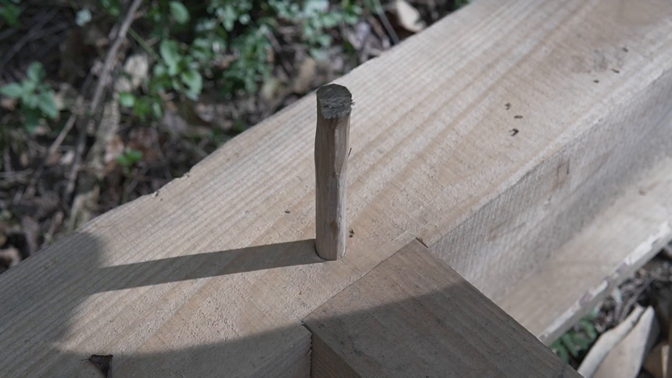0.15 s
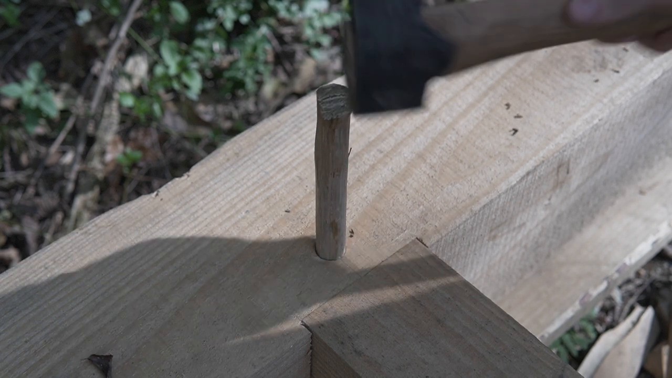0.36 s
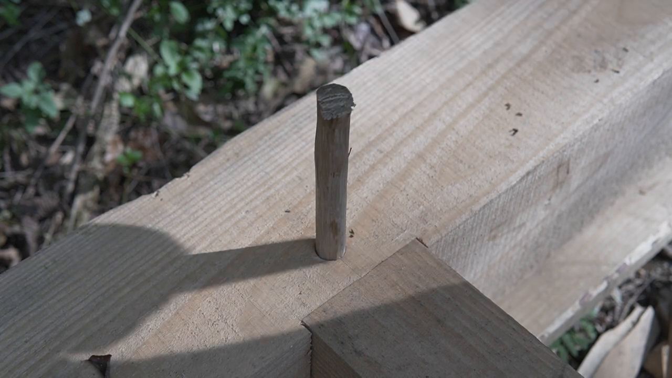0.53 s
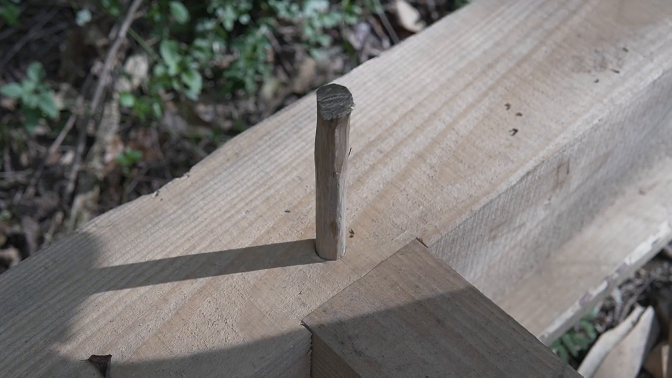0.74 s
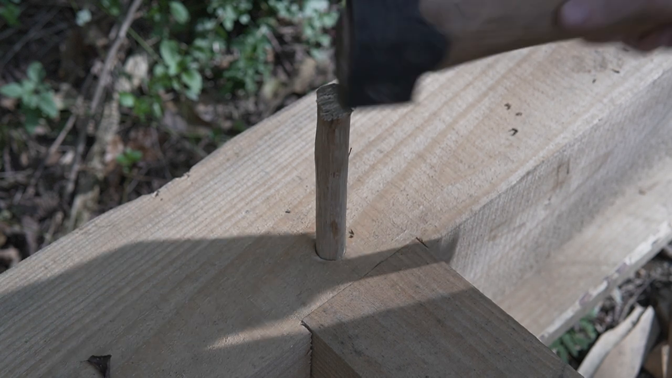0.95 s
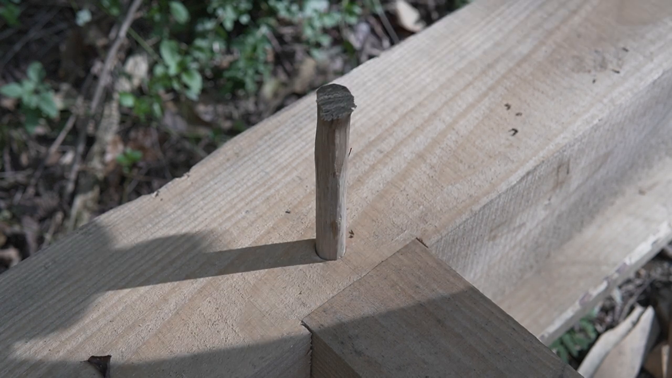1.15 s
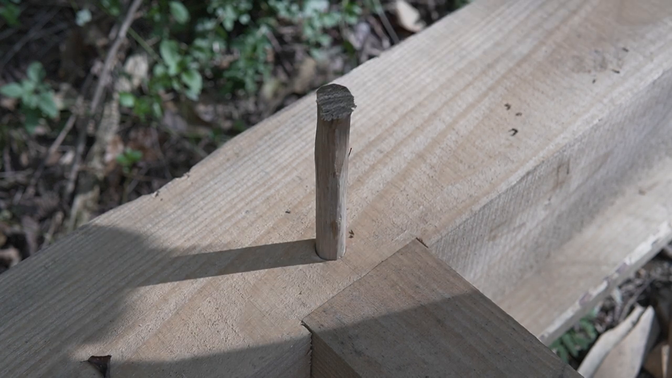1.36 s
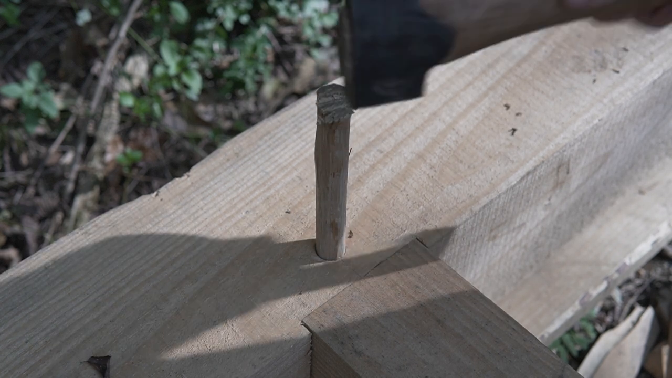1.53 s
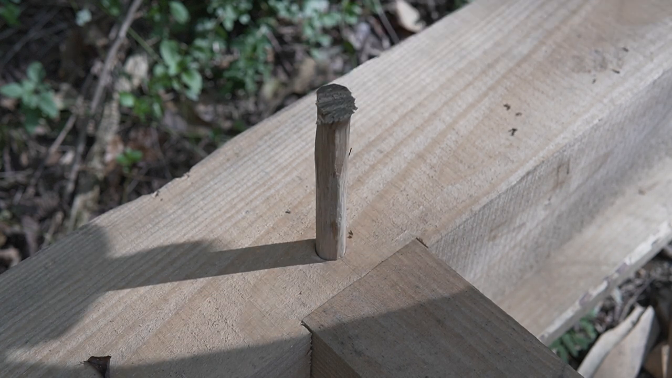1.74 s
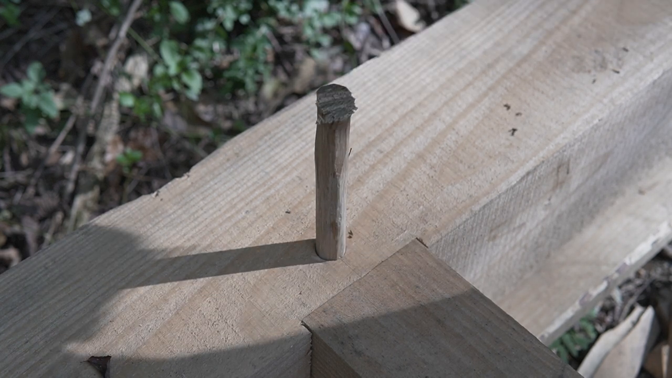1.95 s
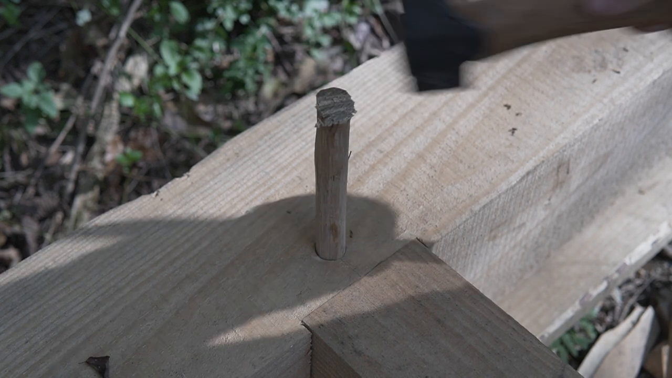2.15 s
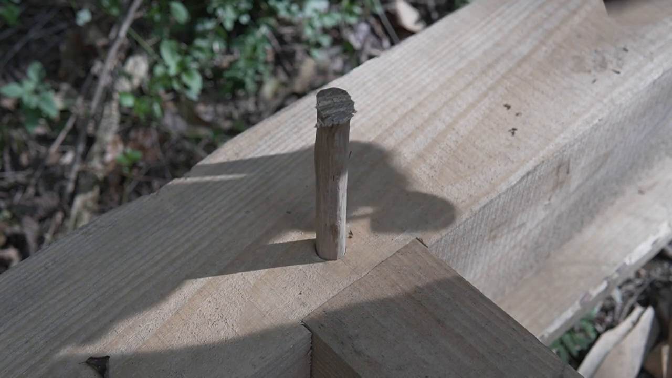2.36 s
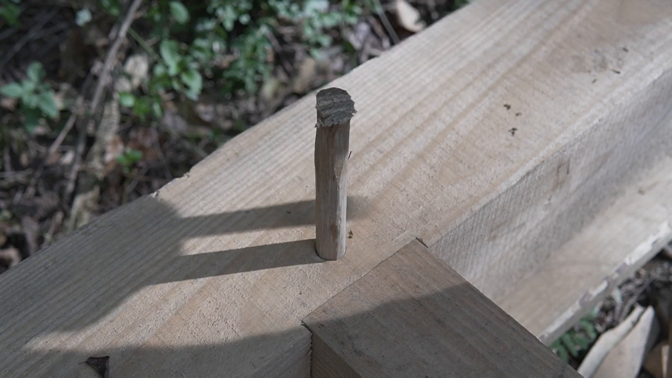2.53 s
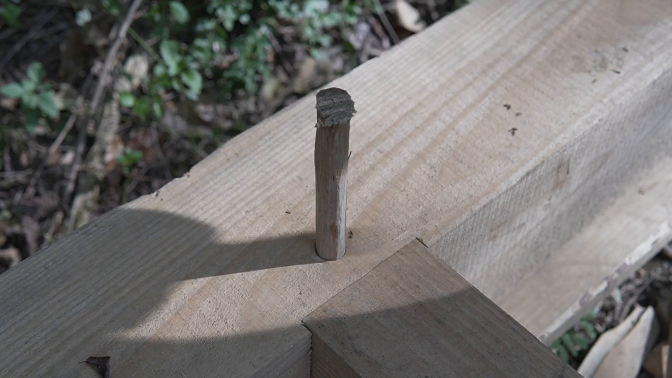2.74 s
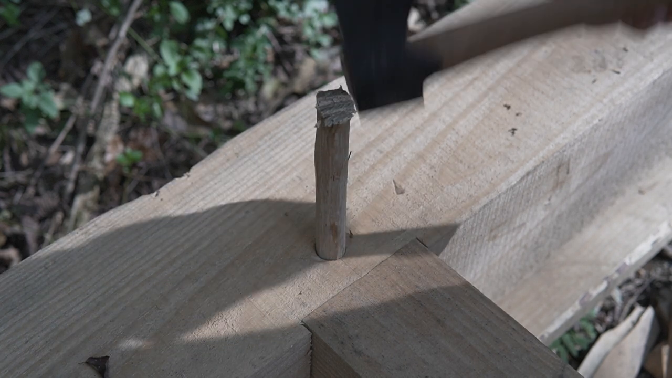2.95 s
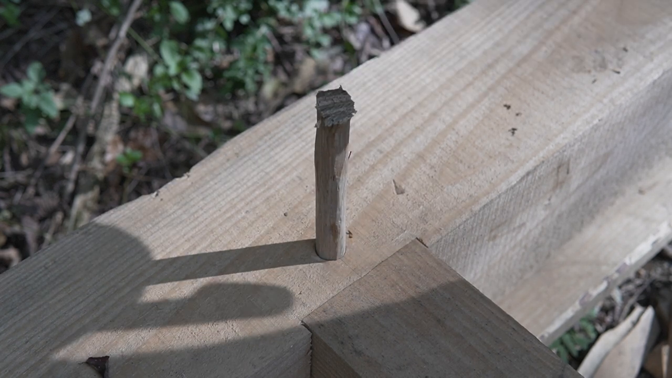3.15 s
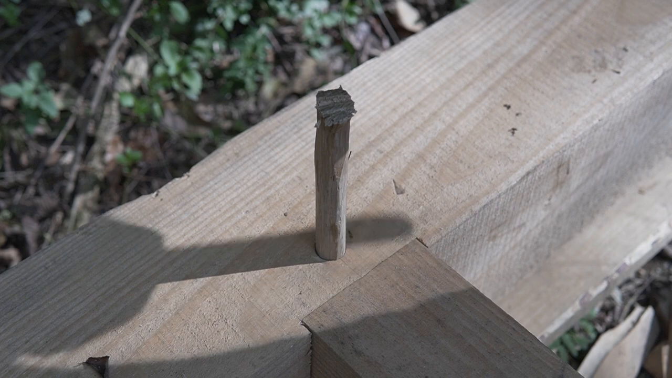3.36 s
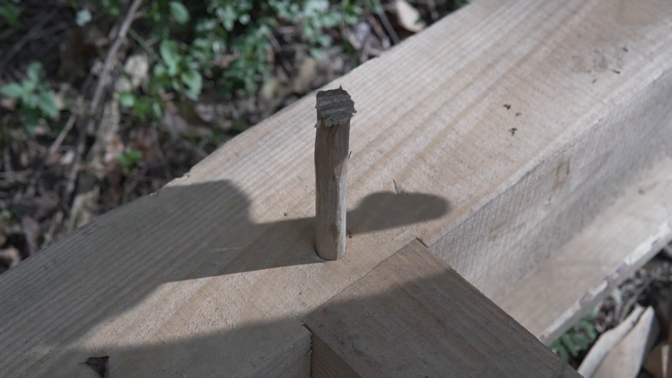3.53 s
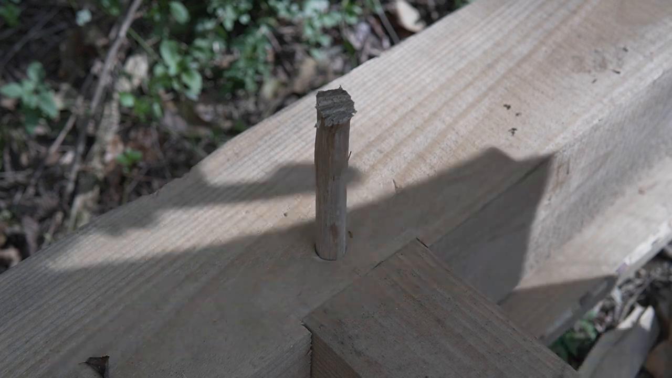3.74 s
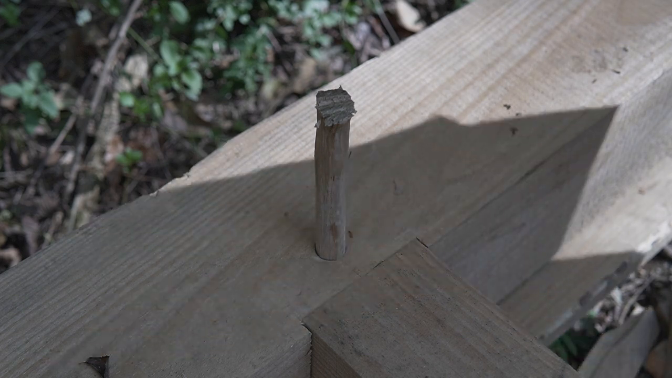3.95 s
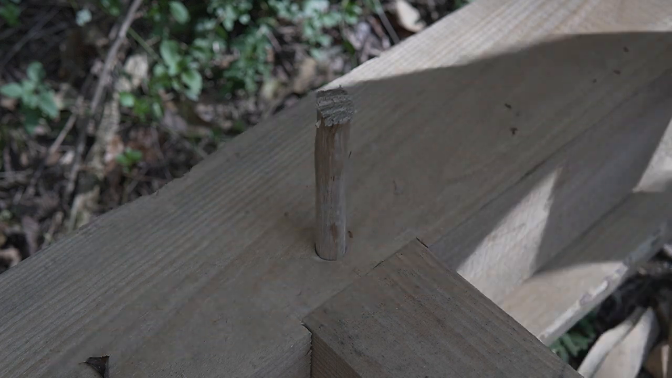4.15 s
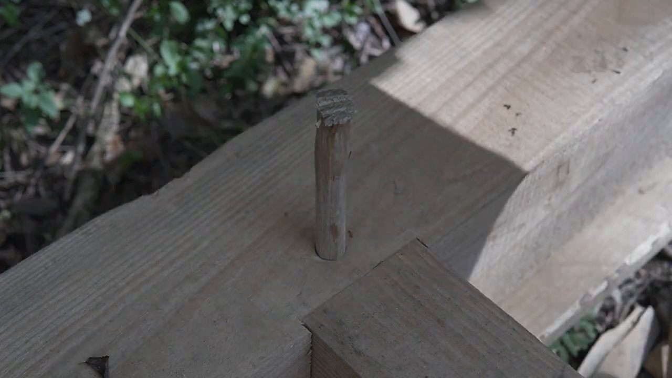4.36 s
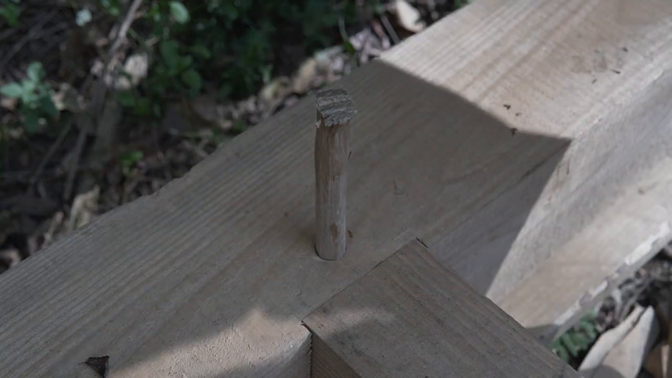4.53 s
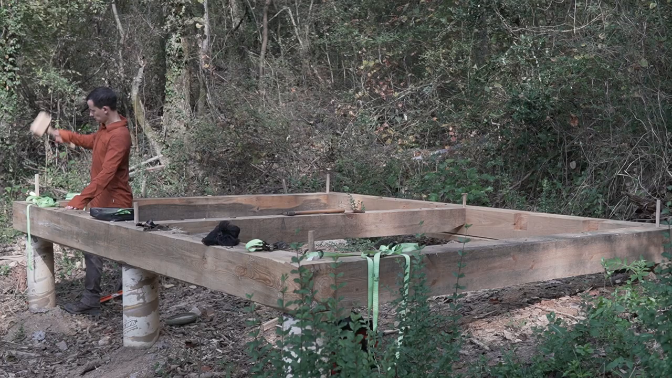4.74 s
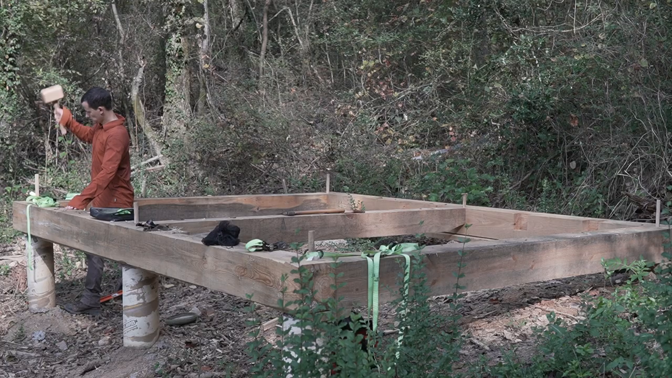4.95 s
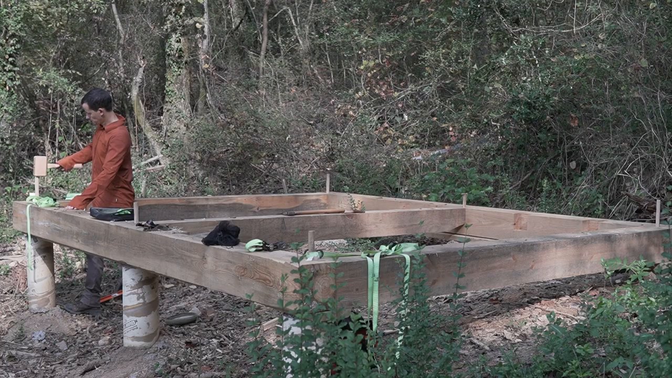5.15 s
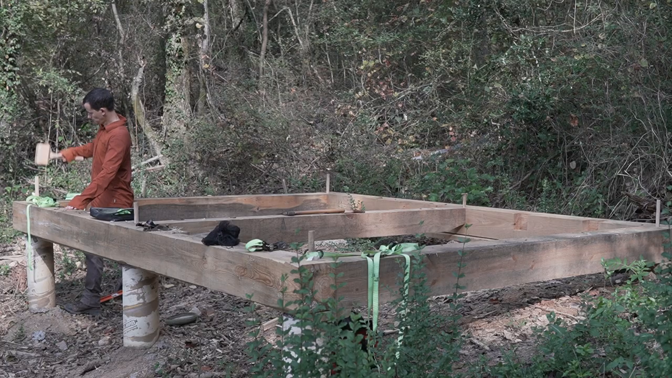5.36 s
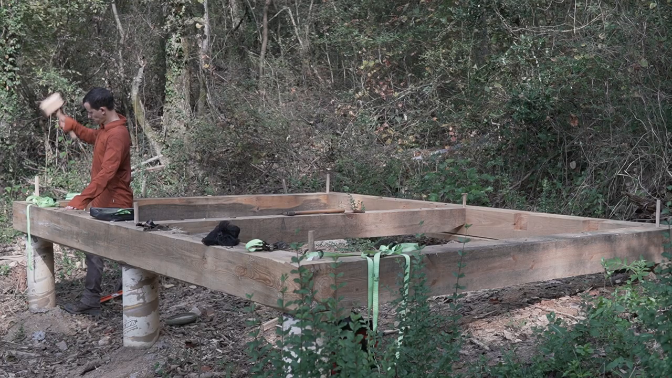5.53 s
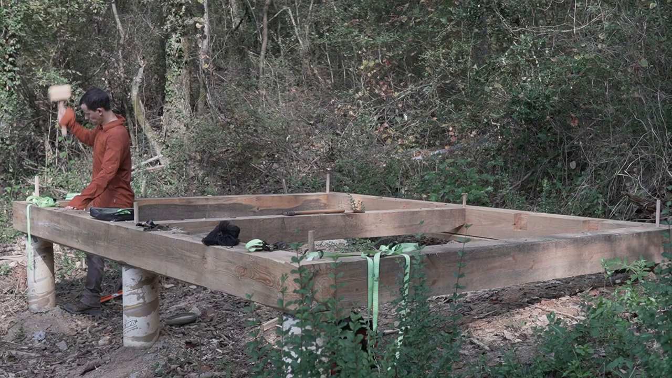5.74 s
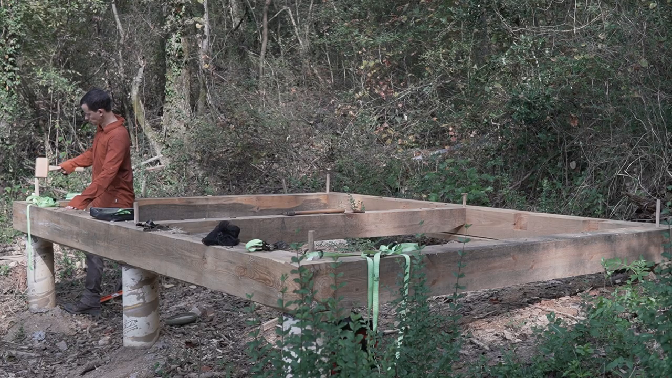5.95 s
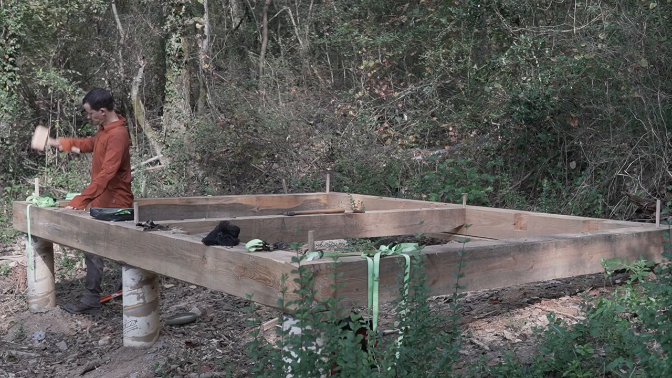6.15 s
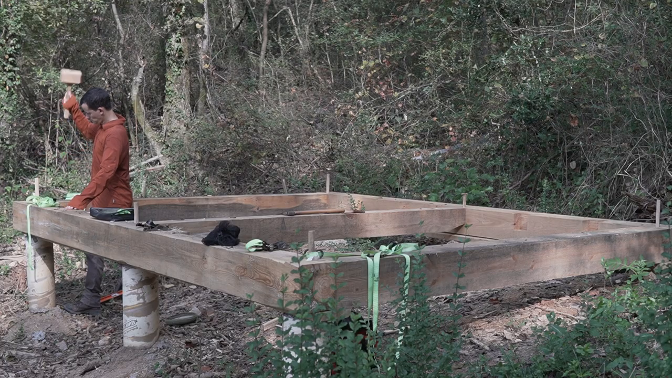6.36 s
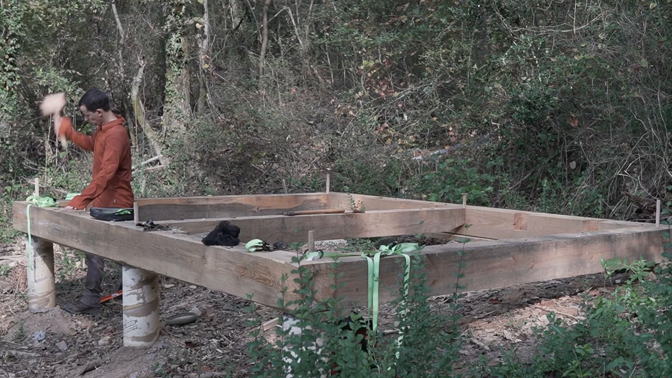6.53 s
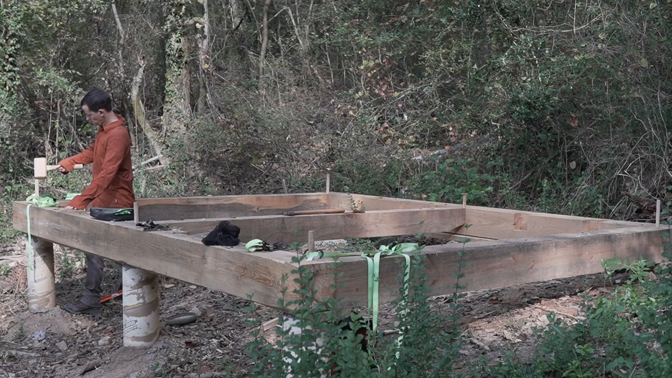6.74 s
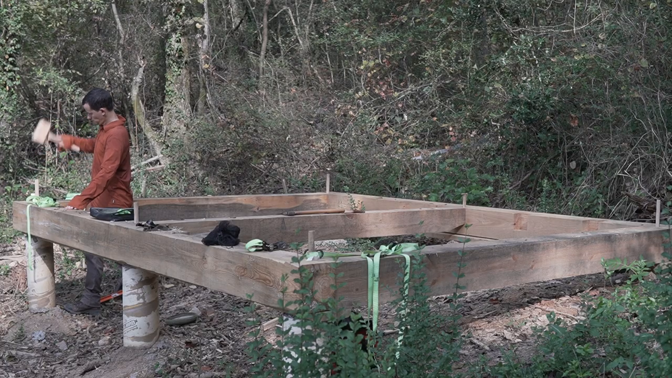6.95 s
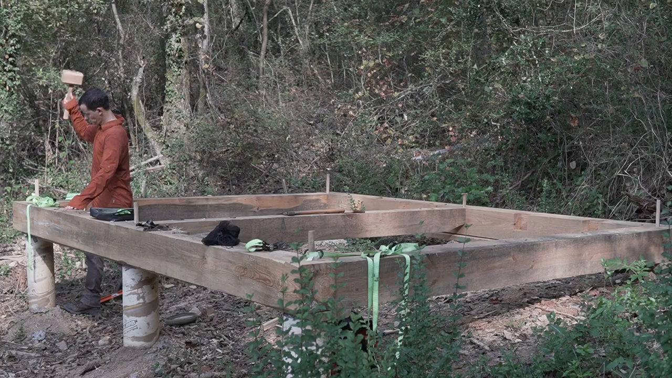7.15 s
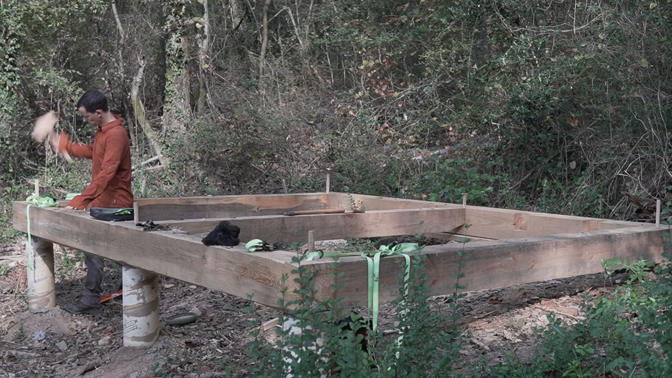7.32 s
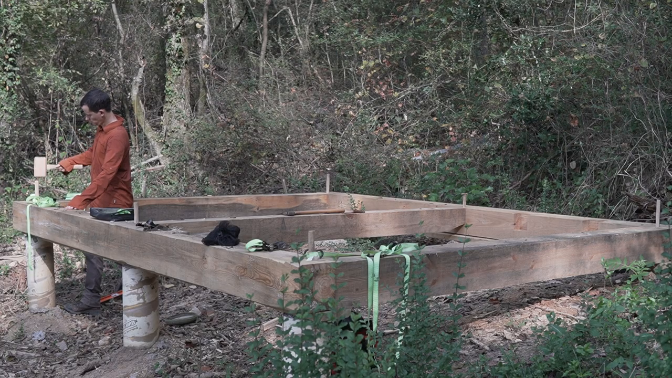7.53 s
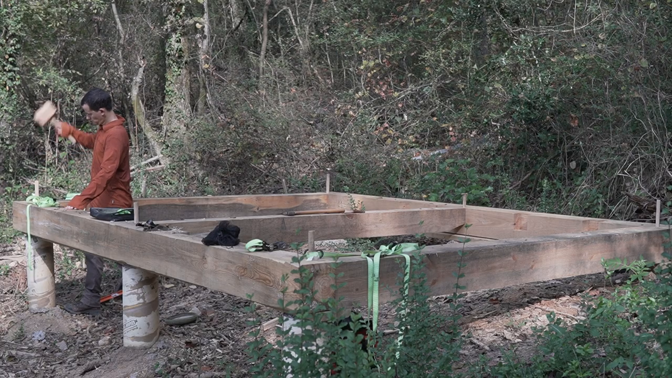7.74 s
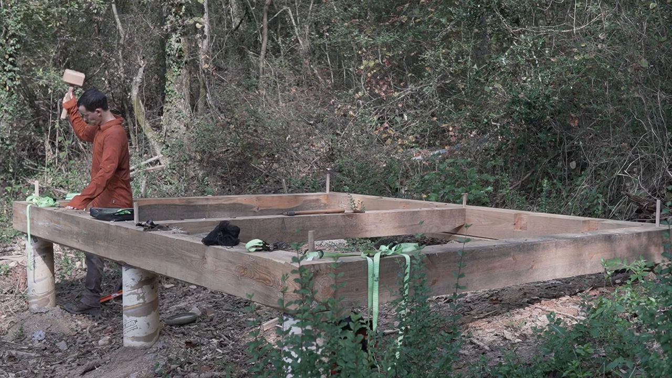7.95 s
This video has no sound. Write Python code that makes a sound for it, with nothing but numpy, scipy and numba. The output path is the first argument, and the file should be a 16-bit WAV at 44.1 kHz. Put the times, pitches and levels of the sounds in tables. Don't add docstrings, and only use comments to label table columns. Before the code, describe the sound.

Close, clipped wooden whacks come about every six tenths of a second, varying from light and low to very hard, each setting heavy beams resonating. After a pause filled with soft leaf crunches, twig ticks and dull heel thuds, the hammering resumes farther off, slower and steady, growing tighter and harder, with echo through the trees. The woodland background is very quiet, with insects, a few chirps and a light breeze.

```python
import sys
import numpy as np
from scipy import signal
from scipy.fft import irfft
from scipy.io import wavfile
from scipy.ndimage import uniform_filter1d
from numba import njit

SR = 44100
rng = np.random.default_rng(int(sys.argv[2]) if len(sys.argv) > 2 else 0)


def materialize(psi):
    bounded = np.clip(np.atleast_2d(psi).T, -1, 1)
    quanta = np.round(bounded * 32767).astype(np.int16)
    wavfile.write(sys.argv[1], SR, quanta)


def gain_from_db(level_db):
    decades = np.asarray(level_db, float) / 20
    return 10 ** decades


N = 356769
LEAD = SR // 2


# t/s, crack level/dB, peg f/Hz, brightness/dB per octave, beam level/dB
NEAR_BLOWS = [
    (-.25, 4, 2000, 7, 1),
    (0.3377, 11.5, 938.5, -2.5, 0.5),
    (0.9225, 2.5, 900, 2, 1),
    (1.4977, 4, 560, -4, 2.5),
    (2.091, 14.5, 915, 2.5, 1),
    (2.8613, 5, 2122, -1.5, -7),
    (2.8963, -12, 803.7, -3.5, -2),
]
# echo peak at the peg level/dB, its width/octaves, mallet f/Hz, its level/dB, splinter level/dB
NEAR_HUE = (3.5, 1.47, 2699, -0.94, 0.57)
# f/Hz, level/dB, t60/s
NEAR_HEAD = [(1140, -8.5, 0.037), (1747, -6, 0.026), (2180, -6, 0.019), (5210, -10.5, 0.0057)]
# f/Hz, level/dB
NEAR_KNOCK = [(150, -25), (400, -4.5), (800, 0), (1250, -3), (1800, -20.5), (4000, -49.5)]
# f/Hz, level/dB, t60/s
NEAR_BEAMS = [(77, -16, 0.39), (141, -15, .32), (220, -6, 0.27), (303.7, -0.5, 0.27), (372.7, -5, .22),
              (477, -13.5, 0.22), (598, -13, .15), (627, -11.5, 0.12), (900, -15.5, 0.13)]
# f/Hz, level/dB, t60/s
FRAME_SWAY = [(23.93, -30, 4.3), (37.4, -35, 4.1)]
# f/Hz, level/dB
NEAR_TREES = [(100, -31), (300, -9), (700, -5), (1500, -4.5), (2400, -2), (3500, 2), (4600, -12),
              (9000, -25), (15000, -33.5), (17000, -51)]


def near_blows():
    mix = np.zeros(LEAD + N)
    for s, db, hz, tilt_db, beams_db in NEAR_BLOWS:
        hit = crack(hz, tilt_db, NEAR_HEAD, NEAR_HUE, contact=.002, snap_db=0.5, peg_t60=0.013)
        add(mix, s, gain_from_db(db) * hit)
        echo_db = 0.58 * db + .8 * tilt_db
        echo = trees(NEAR_TREES, hz, tilt_db, NEAR_HUE, rise=0.0027, early_db=2.5, early_t60=0.033,
                     edge_s=0.065, edge_db=6.5)
        add(mix, s, gain_from_db(echo_db) * echo)
        thump = ring([(339.6, 5.5, 0.033), (560, -3, 0.01)], .1, rise=0.00025)
        add(mix, s, gain_from_db(beams_db + 0.5) * thin(thump))
        knock = evened(signal.oaconvolve(rng.standard_normal(6000), thick(NEAR_KNOCK), "same"))
        add(mix, s, gain_from_db(.3 * db - 15.5 - 60 * np.arange(6000) / SR / 0.096) * knock)
        add(mix, s, beams(NEAR_BEAMS, beams_db - 6.5, rise=0.02, slowing=0.71, twin_db=-4.0,
                          joints_db=-7.5, joints_t60=0.2))
        add(mix, s + 0.024, gain_from_db(beams_db - 6.5) * ring(FRAME_SWAY, 3.1, rise=.03))
        burst = rng.standard_normal(2600) * np.hanning(2600)
        slap = signal.oaconvolve(burst, ring([(647, 0, 0.018)], 0.037))
        add(mix, s + .185, gain_from_db(beams_db - 55) * evened(slap))
    return mix[LEAD:]


# t/s through the air, crack level/dB, peg f/Hz, mallet f/Hz, loudest beam f/Hz
FAR_BLOWS = [
    (5.1491, -1, 1267, 3507, 269),
    (5.914, 0, 1600, 1103, 259.7),
    (6.6678, 3, 1449, 1823, 286.3),
    (7.4296, 7, 1833, 1179, 306.2),
]
# f/Hz, level/dB, t60/s
TIMBER_KNOCK = [(1270, 6, 0.052), (1600, 5, .03), (2000, 8, 0.027), (3300, -16, 0.046)]
# f/Hz, level/dB, t60/s
FAR_HEAD = [(2000, -11.5, 0.014), (3073, -9, 0.02), (3830, -13.5, 0.0074), (5900, -11, 0.0077)]
# f/Hz, level/dB, t60/s
FAR_BEAMS = [(73.4, -4.5, 0.29), (103.5, -8, 0.285), (158.9, -4, 0.2624), (226.4, -5, .24),
             (334.2, -16, 0.46), (484, -18.5, 0.13)]
# f/Hz, level/dB
FAR_TREES = [(100, -28), (300, -11), (700, -3.5), (1500, -5.5), (3300, 4), (5000, -5), (9000, -18),
             (15000, -28), (17000, -50)]


def far_blows():
    mix = np.zeros(LEAD + N)
    timber_lead_s = .0069
    for k, (s, db, hz, mallet_hz, beam_hz) in enumerate(FAR_BLOWS):
        loose = 0.14 ** k
        loss_db = 0.5 * loose
        tilt_db = 0.5 - .3 * db
        ring_db = 9.5 + 10 * loose
        hue = (ring_db, 4.8 / ring_db, mallet_hz, .4, -.3)

        knock = ring(TIMBER_KNOCK + [(hz, 5, .04)], .08, rise=0.0014)
        add(mix, s - timber_lead_s, gain_from_db(-14 - .5 * loss_db) * knock)
        hit = crack(hz, tilt_db, FAR_HEAD, hue, contact=.0012, snap_db=-1.0, peg_t60=0.015)
        add(mix, s, gain_from_db(db - 6.5) * hit)
        loose_peg = ring([(hz * .96, -11.5, 0.088), (hz * 1.02, -14.5, 0.088)], .2, rise=.001)
        add(mix, s, loose * loose_peg)
        echo = trees(FAR_TREES, hz, tilt_db, hue, rise=0.0065, early_db=4.0, early_t60=0.193,
                     edge_s=0.043, edge_db=1.0)
        add(mix, s - timber_lead_s, gain_from_db(8 + .45 * db) * echo)
        loudest = (beam_hz, 0.5 - loss_db, 0.26)
        add(mix, s, beams(FAR_BEAMS + [loudest], -17.5, rise=0.011, slowing=0.22, twin_db=-5.0,
                          joints_db=-1, joints_t60=.25))
    return mix[LEAD:]


# f/Hz, level/dB
FIBRE_SNAP = [(300, -29), (1000, -3.5), (2500, 9), (6000, -3.5), (11000, -16.5), (15000, -16.5),
              (17500, -41.5)]


def crack(hz, tilt_db, head, hue, contact, snap_db, peg_t60):
    _, _, mallet_hz, mallet_db, splinter_db = hue
    t = np.arange(4000) / SR
    modes = head + [(hz, 0, peg_t60), (mallet_hz, mallet_db, peg_t60)]
    body = ring(modes, 4000 / SR, rise=0.000086)
    second_contact = np.r_[np.zeros(round(contact * SR)), body][:4000]
    fibres = rng.standard_normal(4000) * np.exp(-(t / (1.7 * contact)) ** 2)
    snap = gain_from_db(snap_db + splinter_db) * coloured(fibres, FIBRE_SNAP)
    return thin(coloured(body + second_contact + snap, [(100, 0), (1e4, 0.00035)], tilt_db))


# f/Hz, level/dB
JOINT_RATTLE = [(60, -14), (150, -0.5), (300, 1), (600, -5.5), (1100, -13.5), (1600, -18.5), (3000, -50.5)]


def beams(modes, db, rise, slowing, twin_db, joints_db, joints_t60):
    detune = rng.uniform(-1, 1, len(modes))
    twins = [(hz * (1 + .07 * a), d + twin_db, 1.1 * t60) for (hz, d, t60), a in zip(modes, detune)]
    t = np.arange(SR // 2) / SR
    tones = np.zeros(len(t))
    for mode in modes + twins:
        swell = 1 - np.exp(-(t / rise * (mode[0] / 300) ** slowing) ** 3)
        tones = tones + ring([mode], .5) * swell
    rattle = evened(signal.oaconvolve(rng.standard_normal(len(t)), thick(JOINT_RATTLE), "same"))
    rattle = rattle * gain_from_db(joints_db - 60 * t / joints_t60) * (1 - np.exp(-t / 0.0013))
    return gain_from_db(db) * (tones + rattle)


# f/Hz, t60/s
WOODS_T60 = [(100, 0.02), (300, 1), (600, 0.73), (1200, 0.83), (3000, 0.74), (6000, 0.6854), (12000, 0.56)]


def trees(colour, peg_hz, tilt_db, hue, rise, early_db, early_t60, edge_s, edge_db):
    peak_db, peak_octaves, mallet_hz, mallet_level_db, _ = hue
    hz, t, z = signal.stft(rng.standard_normal(SR * 3 // 2), SR, nperseg=512)
    peg_db = peak_db * np.exp(-(np.log2((hz + 1) / peg_hz) / peak_octaves) ** 2)
    mallet_db = 0.99 * (mallet_level_db + 3.0) * np.exp(-(np.log2((hz + 1) / mallet_hz) / .22) ** 2)
    colour_db = read(colour, hz) + tilt_db * np.log2((hz + 1000) / 3000) + peg_db + mallet_db
    late = gain_from_db(-60 * t / read(WOODS_T60, hz)[:, None])
    early = gain_from_db(early_db - 60 * t / early_t60)
    tail = signal.istft(z * gain_from_db(colour_db)[:, None] * (late + early), SR, nperseg=512)[1]
    t = np.arange(len(tail)) / SR
    build = 1 - np.exp(-(t / rise) ** 2)
    tree_line = gain_from_db(edge_db * np.exp(-((t - edge_s) / 0.016) ** 2))
    tail = tail * build * tree_line
    return tail / np.linalg.norm(tail)


# t/s, level/dB, f/Hz, t60/s
BEAM_ROCKS = [
    (6.761, -17.5, 288.4, 0.25),
    (7.489, -23, 318, 0.11),
]


def rocking_beams():
    mix = np.zeros(LEAD + N)
    for s, db, hz, t60 in BEAM_ROCKS:
        add(mix, s, ring([(hz, db, t60)], .4, rise=0.13 * t60))
    return mix[LEAD:]


# f/Hz, level/dB
LEAF_LITTER = [(100, -15), (400, 8), (1000, 2.5), (3300, 3.5), (6000, -6.5), (11000, -14.5), (14500, -24),
               (16500, -47)]
# t/s, peak level/dB
TWIG_SNAPS = [(3.1766, -37), (3.2076, -37), (3.2219, -35), (3.2311, -30), (3.2918, -40.5), (3.371, -26.5),
              (3.4353, -43), (3.49, -35), (3.6600, -32), (3.6993, -23), (3.7755, -29), (3.8114, -40),
              (3.8494, -39), (3.952, -35), (3.9757, -38), (3.9992, -33), (4.0424, -51), (4.1591, -44),
              (4.5464, -35), (4.606, -33), (4.5745, -33), (4.6977, -35)]


def twigs():
    mix = np.zeros(LEAD + N)
    for s, db in TWIG_SNAPS:
        tick = rng.standard_normal(200) * np.exp(-np.arange(200) / 17.0)
        tick = 2.7 * tick / np.linalg.norm(tick)
        hz = 3080 * (1 + 0.13 * rng.uniform(-1, 1))
        add(mix, s, gain_from_db(db) * (.5 * coloured(tick, LEAF_LITTER, 5.1) + ring([(hz, -9, .003)], 200 / SR)))
    return mix[LEAD:]


# t/s, length/s, level/dB, brightness/dB per octave
LEAF_CRUNCHES = [(3.209, 0.068, -61, 4.5), (3.417, 0.11, -50, -4), (3.43, 0.025, -58, 5),
                 (3.655, 0.049, -38.5, 4), (3.683, 0.05, -45, 1), (3.74, 0.088, -51, -2),
                 (3.929, 0.092, -52, -1.5), (4.016, 0.12, -55.5, 0), (4.065, 0.077, -49, 3),
                 (4.139, 0.084, -62.5, 2), (4.219, 0.14, -66.5, 3), (4.419, 0.14, -63.5, 1.5),
                 (4.564, 0.085, -54, 2.5), (4.685, .03, -61.5, -1), (3.489, 0.23, -67, 0.5),
                 (3.779, 0.17, -65, 0.5), (3.962, .2, -59, -0.5), (4.3, 0.22, -70, 1.5)]


def leaves():
    mix = np.zeros(LEAD + N)
    for s, length, db, tilt_db in LEAF_CRUNCHES:
        fine, clumps, snaps = rng.standard_normal((9000, 3))[:round(length * SR)].T
        clumps_db = 4 * evened(uniform_filter1d(clumps, 90))
        grains = fine * gain_from_db(clumps_db) * (1 + 2.5 * (snaps > 2.6))
        crunch = evened(coloured(grains, LEAF_LITTER, tilt_db))
        add(mix, s, gain_from_db(db) * crunch * np.hanning(len(crunch)) ** 1.1)
    return mix[LEAD:]


# t/s, level/dB, f/Hz, t60/s
HEEL_THUDS = [(3.44, -45, 388, .05), (3.67, -32, 71.5, 0.074), (3.68, -38, 313, 0.039),
              (3.766, -39.5, 200, 0.071), (3.948, -27.5, 61, 0.093), (3.948, -38.5, 298, 0.044),
              (3.975, -36, 690, 0.021), (3.952, -34, 800, .02), (3.766, -42, 650, .025),
              (3.971, -30.5, 114, 0.036), (4.102, -37, 220, 0.046), (4.606, -30, 320.3, 0.091),
              (4.606, -34, 102, 0.054)]


def thuds():
    mix = np.zeros(LEAD + N)
    for s, db, hz, t60 in HEEL_THUDS:
        add(mix, s, ring([(hz, db, t60)], .4, rise=.0015))
    return mix[LEAD:]


# t/s, length/s, start f/Hz, end f/Hz, level/dB
BIRD_NOTES = [
    (1.977, 0.095, 3486, 3560, -58),
    (5.326, 0.21, 8700, 9050, -78),
    (5.547, 0.068, 4600, 4600, -75),
    (5.65, 0.055, 4590, 4580, -74),
    (6.26, 0.026, 5900, 5900, -68),
    (6.586, 0.0113, 3540, 3440, -63),
    (6.559, .08, 8260, 8440, -81.5),
    (7.865, .03, 3400, 3450, -62),
]


def birds():
    mix = np.zeros(LEAD + N)
    for s, length, start_hz, end_hz, db in BIRD_NOTES:
        u = np.linspace(0, 1, round(length * SR))
        hz = start_hz + (end_hz - start_hz) * np.sin(u * 2.2)
        whistle = np.sin(2 * np.pi * np.cumsum(hz) / SR)
        add(mix, s, gain_from_db(db) * whistle * np.sin(np.pi * u) ** .5)
    return mix[LEAD:]


# f/Hz, width/Hz, level/dB, throb/dB
INSECT_CHOIRS = [
    (6826, 560, -73, 1.),
    (7433, 800, -77.5, 3),
    (3230, 450, -76.5, 4),
]


def insects():
    out = np.zeros(N)
    for centre_hz, width_hz, db, throb_db in INSECT_CHOIRS:
        edges_hz = [centre_hz - width_hz / 2, centre_hz + width_hz / 2]
        band = signal.butter(2, edges_hz, "bandpass", fs=SR, output="sos")
        throb = evened(uniform_filter1d(uniform_filter1d(rng.standard_normal(N), 500), 500))
        out = out + gain_from_db(db + throb_db * throb) * evened(signal.sosfilt(band, rng.standard_normal(N)))
    return out


# f/Hz, level/dB per Hz
DISTANT_AIR = [(65, -33), (110, -1.5), (210, -6), (400, -14), (900, -15.5), (1500, -21), (2500, -26.5),
               (4000, -30.5), (6000, -38), (9000, -55.5)]


def distant_air():
    frames, hz = N // 256 + 5, np.fft.rfftfreq(1024, 1 / SR)
    a, b, patches = rng.standard_normal((frames, 513, 3)).T
    patches = evened(uniform_filter1d(uniform_filter1d(patches, 10, 0), 14, 1))
    z = (a + 1j * b) * gain_from_db(read(DISTANT_AIR, hz)[:, None] + 2.6 * patches)
    air = evened(signal.istft(z, nperseg=1024, noverlap=768)[1][:N])
    return air * gain_from_db(-57.5 + background_db())


def rumble():
    band = signal.butter(2, [19, 115], "bandpass", fs=SR, output="sos")
    lumps_db = 3 * evened(uniform_filter1d(uniform_filter1d(rng.standard_normal(N), 3000), 3000))
    wind = evened(signal.sosfilt(band, rng.standard_normal(N)))
    return gain_from_db(-57 + 1.1 * background_db() + lumps_db) * wind


# t/s, level/dB
BACKGROUND_LEVEL = [(0, -2.5), (1.5, -3), (2.799, -4), (3.3, -1.7), (4.5, -3.5), (4.65, 3.5), (5.099, -0.4),
                    (6.5, 0), (8.09, -1.5)]


def background_db():
    return np.interp(np.arange(N) / SR, *np.transpose(BACKGROUND_LEVEL))


def ring(modes, length, rise=0.):
    t = np.arange(round(length * SR)) / SR
    tones = sum(gain_from_db(db - 60 * t / t60) * np.sin(2 * np.pi * hz * t) for hz, db, t60 in modes)
    return tones * (1 - np.exp(-t / (rise + 1e-5)))


def coloured(x, points, tilt_db=0.):
    hz = np.fft.rfftfreq(512, 1 / SR)
    log_gain = np.log(gain_from_db(read(points, hz) + tilt_db * np.log2((hz + 300) / 2300)))
    circle = np.r_[log_gain, log_gain[-2:0:-1]]
    taps = np.fft.ifft(np.exp(circle - 1j * signal.hilbert(circle).imag)).real[:256]
    return signal.oaconvolve(x, taps)[:len(x)]


def thick(points):
    hz = np.fft.rfftfreq(2048, 1 / SR)
    return np.fft.fftshift(irfft(gain_from_db(read(points, hz)))) * np.hanning(2048)


def thin(x):
    return signal.sosfilt(signal.butter(2, 190, "highpass", fs=SR, output="sos"), x)


def read(points, hz):
    f, value = np.transpose(points)
    return np.interp(np.log(hz + 1), np.log(f + 1), value)


def evened(x):
    return x / np.sqrt(np.mean(x ** 2) + 1e-20)


def add(mix, s, sound):
    part = mix[LEAD + round(s * SR):][:len(sound)]
    part += sound[:len(part)]


def scene():
    blows = near_blows() + far_blows() + rocking_beams()
    steps = twigs() + leaves() + thuds()
    background = birds() + insects() + distant_air() + rumble()
    return (blows + steps + background)[None]


@njit
def follow(power, attack, release):
    out, level = np.empty_like(power), 0.
    for i in range(len(power)):
        level += (power[i] - level) * (attack if power[i] > level else release)
        out[i] = level
    return out


def roll_off(x):
    return signal.sosfilt(signal.butter(12, 16710, fs=SR, output="sos"), x)


def record(dry):
    dry = dry + gain_from_db(-76.5) * rng.standard_normal(dry.shape)
    power = follow(dry[0] ** 2, attack=1 / (.004 * SR), release=1 / (0.0048 * SR))
    level_db = 10 * np.log10(power + 1e-12)
    limited = dry / gain_from_db(0.57 * np.maximum(level_db + 11.5, 0))
    clipped = limited / (1 + abs(limited) ** 6) ** (1 / 6)
    smoothed = signal.sosfilt(signal.butter(4, 16000, fs=SR, output="sos"), clipped)
    return roll_off(np.clip(1.168 * smoothed, -1, 1))


dry = scene()
out = record(dry)
materialize(out)
```